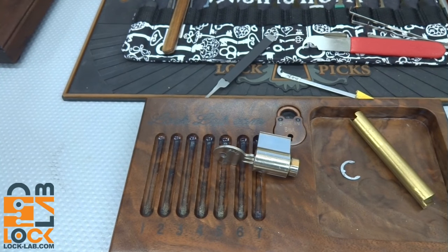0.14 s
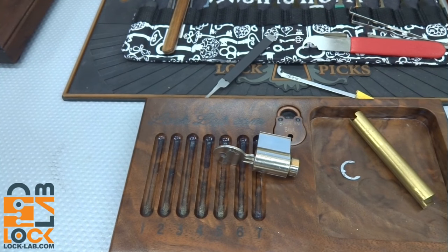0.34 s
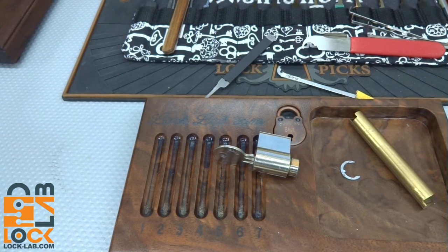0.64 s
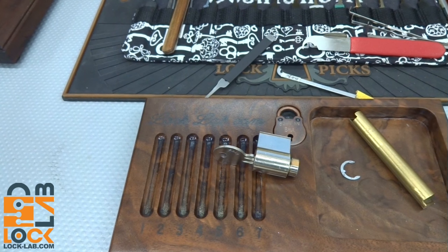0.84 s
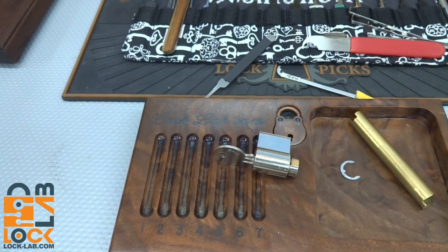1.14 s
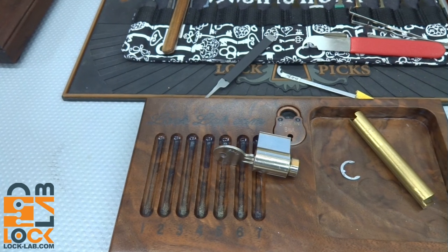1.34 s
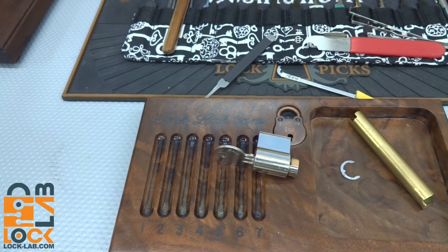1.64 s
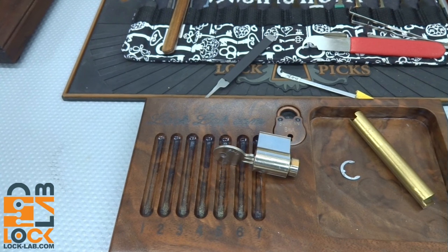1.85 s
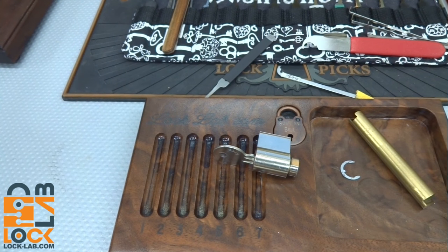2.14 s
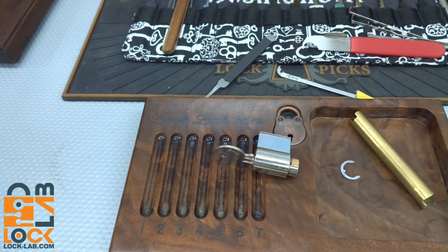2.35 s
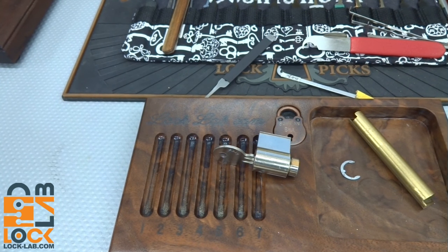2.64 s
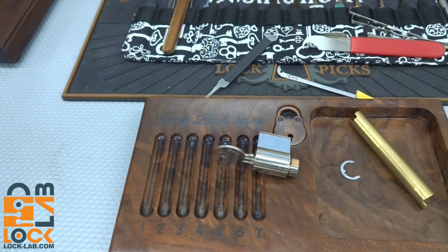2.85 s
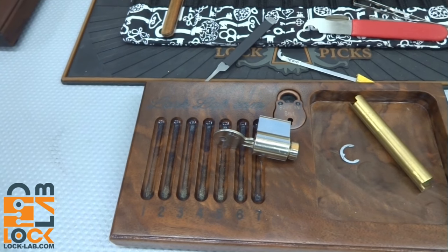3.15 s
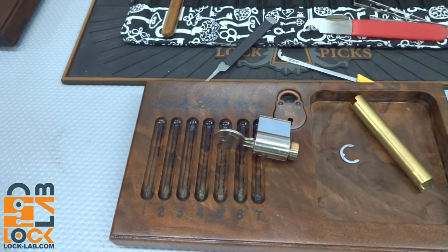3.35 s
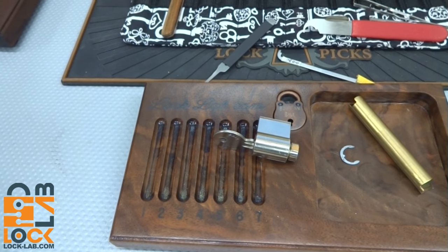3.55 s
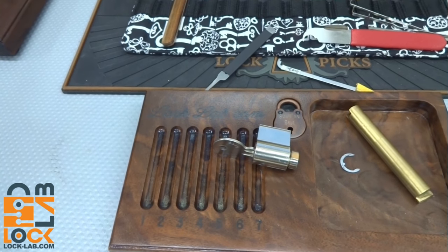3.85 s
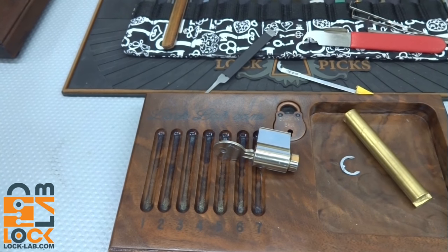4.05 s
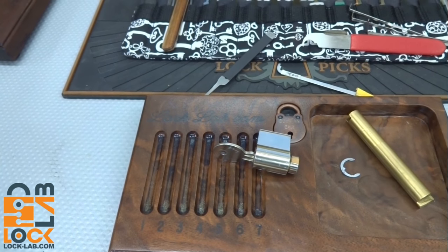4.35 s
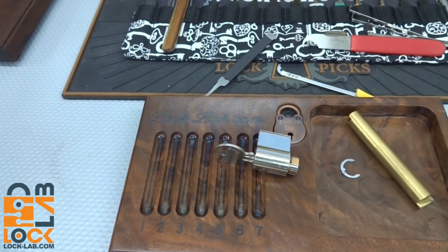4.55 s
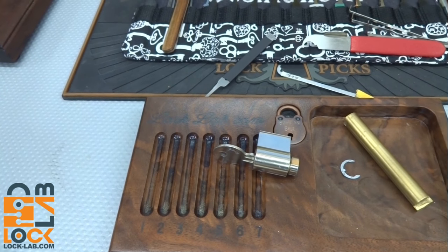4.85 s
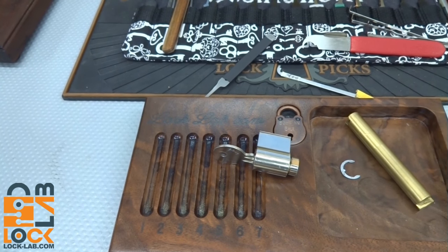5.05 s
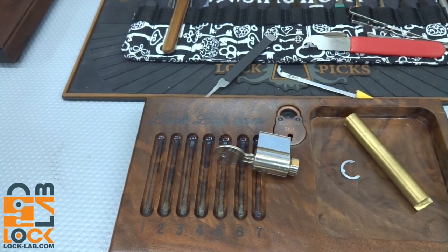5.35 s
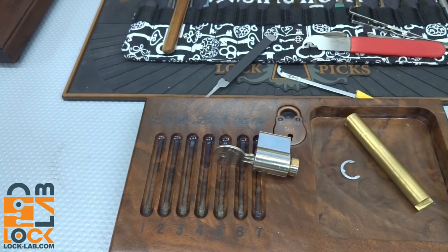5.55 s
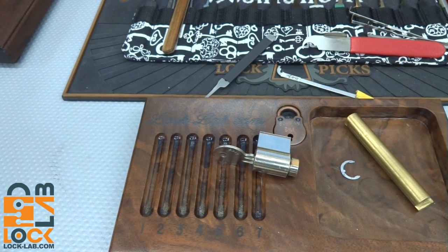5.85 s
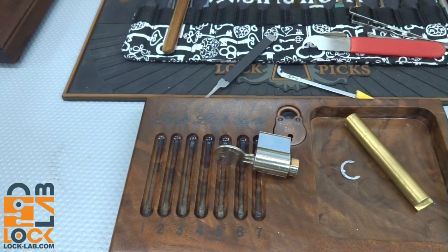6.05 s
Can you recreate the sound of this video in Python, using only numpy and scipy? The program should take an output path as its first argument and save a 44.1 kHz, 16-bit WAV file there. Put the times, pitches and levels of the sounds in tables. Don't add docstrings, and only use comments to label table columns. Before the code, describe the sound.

Unseen hands rummage through loose metal tools, leaving a wavering steel ring, then crinkle wrapping, bang a drawer and set tinkling parts on a bench.

```python
import sys
import numpy as np
from scipy import signal
from scipy.io import wavfile
from scipy.ndimage import uniform_filter1d

SR = 44100
rng = np.random.default_rng(int(sys.argv[2]) if len(sys.argv) > 2 else 0)


def persist_wave(psi):
    counts = np.round(np.clip(psi, -1, 1) * 32767).astype(np.int16)
    wavfile.write(sys.argv[1], SR, np.atleast_2d(counts).T)


def level_to_linear(level):
    exponent = np.asarray(level, float) / 20
    return 10 ** exponent


N = 273841


def evened(x):
    return x / np.sqrt(np.mean(x ** 2) + 1e-20)


def read(points, hz):
    f, value = np.transpose(points)
    return np.interp(np.log(hz + 1), np.log(f + 1), value)


def add(mix, s, sound):
    part = mix[round(s * SR):][:len(sound)]
    part += sound[:len(part)]


def colour(x, points):
    skirt_db = -40.5
    points = [(points[0][0] / 4, points[0][1] + skirt_db)] + points
    hz = abs(np.fft.fftfreq(4096, 1 / SR))
    log_gain = np.log(level_to_linear(np.maximum(read(points, hz), -100)))
    minimum_phase = np.exp(np.conj(signal.hilbert(log_gain)))
    taps = np.fft.ifft(minimum_phase).real[:2048]
    return signal.oaconvolve(x, taps)[:len(x)]


def ring(x, hz, t60):
    r = level_to_linear(-60 / (max(t60, .002) * SR))
    w = 2 * np.pi * min(hz, SR / 2.1) / SR
    return signal.lfilter([0, np.sin(w)], [1, -2 * r * np.cos(w), r * r], x)


def drift(per_s, size):
    steps = rng.standard_normal(200)
    return np.interp(np.arange(size) * per_s / SR, np.arange(len(steps)), steps)


def wavering_db(size):
    return 1.3 * drift(18, size=size) + 2.6 * drift(70, size=size)


def contacts(per_s, spread_db, size=N):
    chance, big, sign = rng.random((3, size))
    height = level_to_linear(spread_db * np.minimum(-np.log(big + 1e-9), 4))
    return (chance < per_s / SR) * height * np.sign(sign - .5)


def effort(t, held, swell_db, fade_db_per_s):
    attack_s, settling_db, settling_db_per_s = 0.0053, -25.5, 44
    after = np.maximum(t - held, 0)
    hold_db = swell_db * (np.clip(t / held, 0, 1) - (swell_db > 0))
    release = level_to_linear(-fade_db_per_s * after) + level_to_linear(settling_db - settling_db_per_s * after)
    return np.clip(t / attack_s, 0, 1) * level_to_linear(hold_db) * release


def loose(train, points, t60, ringing_db, count):
    lo_hz, hi_hz, step = 1.1 * points[1][0], .92 * points[-2][0], SR // 10
    rings, which = np.zeros(N), rng.integers(0, count, N)
    for at in range(0, N, step):
        near, part = which[at:at + step], train[at:at + step]
        pitches = lo_hz * (hi_hz / lo_hz) ** rng.random(count)
        for k, hz in enumerate(pitches):
            struck = np.pad(part * (near == k), (0, step // 2))
            add(rings, at / SR, np.sqrt(hz) * ring(struck, hz, t60))
    sound = colour(evened(train) + level_to_linear(ringing_db) * evened(rings), points)
    return sound / np.sqrt(uniform_filter1d(sound ** 2, 3000) + 1e-20)


# frequency in Hz, level in dB per Hz
AIR = [(15, -65), (25, -13), (219, -12.5), (303, -8.5), (683, -1.5), (849, -7), (1050, -2), (1270, -4.5),
       (5980, -15), (10300, -16), (16300, -31)]


def hush():
    shared, left, right = (evened(colour(v, AIR)) for v in rng.standard_normal((3, N)))
    return level_to_linear(-53) * (0.25 * shared + 0.8 * np.array([left, right]))


# frequency in Hz, level in dB per Hz
BENCH = [(24, -51), (40, -26), (130, -10), (198, -5.5), (252, -1.5), (291, -9), (366, -2.5), (480, -3.5),
         (620, -38), (1060, -120)]
DRAWER = [(240, -24), (400, -6), (524, 2.5), (627, 2.5), (780, 4), (1140, 2.5), (1630, 3), (2230, -5),
          (2400, -3.5), (3120, -14), (5280, -120)]
TOOLS = [(1180, -23), (2000, -4), (2470, -6), (2700, -5.5), (3360, -5), (3910, -5), (6500, -21),
         (8450, -29.5), (14300, -120)]
THIN = [(3240, -19.5), (5500, -10), (6400, -9.5), (7750, -5), (11600, -5.5), (12700, -4), (15100, -8),
        (16100, -16), (16400, -31.5)]
STEEL = [(3240, -12), (5500, 4), (6900, -0.5), (7910, 2), (10400, 1), (15400, -10.5), (16300, -27)]
# start in seconds, end in seconds
WRAPPING_TIMES = [
    (2.065, 2.985),
    (3.355, 3.545),
    (3.955, 4.0),
]
# start in seconds, held time in seconds, force in dB,
# weight on the bench in dB, sheen (brightness) in dB
JOLTS = [(0.082, 0.067, -35.5, -46, -8), (0.523, .005, -44, -14, 11), (0.621, .025, -39, -21, -3),
         (0.752, 0.027, -21.5, -14.5, -15.5), (0.917, 0.079, -19, -12.5, -7),
         (1.0, 0.39, -33.5, -14.5, -12.5), (1.406, 0.11, -21.5, -19, 3), (1.608, 0.18, -19, -15, 2.5),
         (2.071, 0.031, -42, -31, 11), (2.986, 0.12, -22.5, -1.5, -11.5), (2.995, 0.17, -41, -30, 28),
         (3.262, 0.07, -38, -30, 27), (3.231, 0.0033, -24, -28, -14.5), (3.259, 0.035, -18, -4.5, -10.5),
         (3.355, 0.067, -30.5, -21, 31.5), (3.551, 0.031, -21, -6.5, 6.5), (3.716, 0.085, -17.5, -13, 0),
         (3.9, 0.0099, -25, -32, 5), (3.955, 0.041, -27, -9.5, 14.5), (4.085, 0.0093, -33.5, -23, 17),
         (4.256, 0.07, -37, 1, 1.5), (4.414, 0.031, -22, -13.5, -10.5), (4.949, 0.012, -44, -37, -3),
         (5.486, 0.0061, -46.5, -28, 18), (5.535, 0.14, -52.5, -25, 14), (5.864, .01, -63, -20, 2)]
# start in seconds, swelling time in seconds, force in dB,
# weight on the bench in dB, sheen in dB
SLIDES = [(0, 0.066, -52.5, -15, -15.5), (.2, 0.23, -51, -23, -7), (.635, 0.025, -33.5, -8.5, -5),
          (.68, 0.053, -38.5, -4, -1), (.49, 0.02, -56.5, 2.5, -6), (.77, 0.05, -23.5, -19, 9.5),
          (1.224, 0.12, -24.5, -13.5, -8.5), (1.5, 0.072, -26, -14, -16.5), (2.95, 0.036, -36, -21, -5),
          (4.13, 0.088, -50, -1.5, -8), (4.62, 0.19, -60, -19, -23), (4.86, 0.08, -50.5, -35, -6),
          (4.97, 0.16, -38.5, -8, 18), (5.23, 0.068, -36.5, -22, 11), (5.87, 0.1, -51.5, -21, -6),
          (6.08, 0.43, -52, -13, 39)]
# time in seconds, effort in dB
CRUMPLE = [
    (2.165, -61.5),
    (2.417, -40),
    (2.653, -25.5),
    (2.681, -26.5),
    (2.691, -24),
    (2.853, -29.5),
    (2.883, -31),
    (2.98, -37),
]
# offset in dB, share of effort (no unit)
CRUMPLE_PARTS = (-74, .2), (-39, 0.27), (-18, 0.59), (2.5, 0.97)
FADES = 131, 152, 142, 203
SHEEN_SHARES = -0.67, -0.45, -0.012, 0.39


def rummage():
    sag_db_per_s, swell_db_of_slides = 15, 20
    train = contacts(4000, spread_db=2.1)
    t, coarse = np.arange(N) / SR, np.arange(0, N, 32) / SR
    wrapped = sum((t > a) & (t < b) for a, b in WRAPPING_TIMES)
    wrapping = loose(train, THIN, 0.028, ringing_db=-25, count=4)
    steel = loose(train, STEEL, .025, ringing_db=-11, count=10)
    bench = loose(train, BENCH, 0.072, ringing_db=-15.5, count=4)
    drawer = loose(train, DRAWER, 0.11, ringing_db=-12.5, count=8)
    tools = loose(train, TOOLS, 0.019, ringing_db=-8.0, count=10)
    thin = np.where(wrapped, wrapping, steel)
    moves = [(-sag_db_per_s * row[1], *row) for row in JOLTS]
    moves += [(swell_db_of_slides, *row) for row in SLIDES]
    crumple_db = np.interp(coarse, *np.transpose(CRUMPLE), -200, -200)
    out = 0
    for k, layer in enumerate((bench, drawer, tools, thin)):
        offset_db, share = CRUMPLE_PARTS[k]
        power = level_to_linear(offset_db + share * crumple_db) ** 2 * (crumple_db > -199)
        for swell_db, s, held, force_db, weight_db, sheen_db in moves:
            db = force_db + SHEEN_SHARES[k] * sheen_db + (weight_db if k == 0 else 0)
            power = power + (level_to_linear(db) * effort(coarse - s, held, swell_db, FADES[k])) ** 2
        out = out + layer * np.interp(t, coarse, np.sqrt(power))
    return level_to_linear(-4.5) * out


def knock(s, peak_db, hz, bright_db, t60, cycles=18, rise_s=0.00067):
    t = np.arange(5000) / SR
    swell = (1 - np.exp(-t / rise_s)) * level_to_linear(-60 * t / t60)
    bounces = (rng.random(len(t)) < 9000 / SR) * rng.standard_normal(len(t)) * swell
    note = ring(bounces, hz, cycles / hz) + 0.5 * ring(bounces, 1.74 * hz, 0.38 * cycles / hz)
    note = signal.lfilter(*signal.butter(2, hz / 2, "high", fs=SR), note)
    crack = colour(bounces, THIN if hz > 7000 else STEEL)
    clatter = colour(bounces, TOOLS)
    parts = (note, -.5), (crack, bright_db + 12), (clatter, -12)
    sound = sum(level_to_linear(peak_db - 6.0 + db) * p / abs(p).max() for p, db in parts)
    return signal.lfilter(*signal.butter(2, hz / 6, "high", fs=SR), sound)


def knock_each(rows, **kind):
    out = np.zeros(N)
    for row in rows:
        add(out, row[0], knock(*row, **kind))
    return out


# start in seconds, peak in dB, pitch in Hz, brightness in dB
OPENING = [(.54, -31.5, 1470, -24), (0.11, -18, 3800, -31), (0.618, -20.5, 1440, -13),
           (0.658, -26, 1070, -2), (0.762, -2, 774, -34), (0.809, -33, 744, -7), (0.928, -3, 2730, -34),
           (0.959, -12, 750, -27), (1.289, -15, 2660, -30), (1.332, -29, 1350, -25), (1.36, -17, 1920, -9),
           (1.43, -6.5, 1840, -9.5), (1.47, -13, 1110, -9), (1.689, -10, 1120, -1), (1.579, -4, 990, -30),
           (2.121, -34, 1270, -23), (2.339, -48, 1140, 7)]


def opening_knocks():
    return knock_each(OPENING, t60=0.11)


# start in seconds, length in seconds, pitch in Hz, level in dB
RUBS = [(.27, 0.05, 120, -64), (.5, 0.035, 168, -55), (1.29, 0.034, 1353, -30), (1.34, 0.043, 1893, -39),
        (1.455, 0.031, 2524, -20.5), (1.56, 0.063, 1750, -21), (1.575, 0.026, 997, -17),
        (1.585, 0.024, 697, -12.5), (1.6, 0.252, 266.5, -36), (1.62, .06, 2430, -24.5),
        (1.62, 0.21, 5400, -30), (1.68, 0.12, 1925, -29), (1.7, 0.089, 3990, -25.5),
        (1.745, 0.06, 4680, -20), (1.64, 0.2, 15830, -47), (1.656, 0.17, 13800, -42),
        (1.678, 0.12, 12500, -42), (1.7, 0.12, 14900, -40), (1.7, 0.083, 8900, -29.5),
        (1.423, 0.023, 2930, -23), (1.529, 0.034, 423, -29), (1.831, .07, 2250, -33),
        (3.729, 0.057, 1923, -22), (3.816, 0.036, 1660, -31), (3.577, 0.051, 627, -28.5),
        (5.87, .05, 1480, -59), (.62, 0.043, 1150, -39), (4.413, 0.13, 303.5, -35.5),
        (4.721, .07, 421, -53), (2.0, 0.046, 846, -45), (2.18, 0.061, 850, -52), (2.74, 0.085, 199, -61),
        (3.015, 0.039, 135, -19), (3.115, 0.031, 243, -12.5), (3.14, 0.027, 142, -19.5),
        (4.09, 0.032, 958, -40), (4.5, 0.12, 87, -49)]


def rubs():
    out = np.zeros(N)
    for s, length, hz, db in RUBS:
        t = np.arange(0, length, 1 / SR)
        clock = np.cumsum(1 + .006 * drift(90, size=len(t))) / SR
        level = level_to_linear(db + wavering_db(len(t))) * np.sin(np.pi * t / length)
        add(out, s, level * np.sin(2 * np.pi * hz * clock))
    return out


# start in seconds, peak in dB, pitch in Hz, brightness in dB
TICKS = [(0.849, -1.5, 3480, -25), (0.913, -4.5, 1310, -29), (2.444, -33, 730, -39), (2.691, -13, 9500, -8),
         (2.79, -33, 800, -25), (3.031, -4.5, 870, -14), (3.083, -12, 696, -19), (3.267, -1, 1010, -31),
         (3.109, 1, 498, -32), (3.118, -6.5, 352, -30), (3.551, -1.5, 4330, -22), (3.994, -3, 2330, -15),
         (4.006, -12.5, 1730, -10), (4.186, -29.5, 458, -16), (4.197, -27, 1800, -20),
         (5.282, -24.5, 1940, -4), (5.571, -36, 1420, -16), (5.728, -49, 500, -22), (5.912, -38, 3000, -7),
         (5.924, -27, 680, -35), (5.945, -28, 725, -35), (5.968, -31.5, 610, -29), (5.995, -41, 620, -28),
         (.769, -8, 910, -26), (.979, -15.5, 1510, -21), (1.667, -11.5, 2230, -5), (3.297, -2, 694, -22),
         (3.829, -16, 1700, -7), (4.453, -5, 1600, -19.5)]


def ticks():
    return knock_each(TICKS, t60=0.065, cycles=10.5)


# start in seconds, held time in seconds, level in dB
JOSTLE = [
    (0.927, 0.066, -28.5),
    (1.398, 0.15, -31),
    (1.62, .23, -35.5),
]
BENDING_HZ = [421, 840, 1175, 2299, 3792, 5640, 7832, 10500, 13100, 15500]
# level in dB, time to die by 60 dB in seconds
BENDING = [(-14, 4.5), (-28, 1.12), (-7, 7), (-4, 4.46), (-2, 1.68), (-3, 0.96), (-3, 0.72), (-12, 0.32),
           (-21, 0.3), (-24, .3)]
RODS_FLAT = [-.9, .3, 0, 1.05, 1.9, 2.6]
RODS = [-9.5, -10, -4, -5.5, -6, -7]


def rods():
    start, lifted_s, gripped_s = .88, 1.75, 2.99
    t = start + np.arange(round(2.2 * SR)) / SR
    jostle = sum(level_to_linear(db) * effort(t - s, held, -.01, fade_db_per_s=143) for s, held, db in JOSTLE)
    lying = 1 / (1 + np.exp((t - lifted_s) / 0.056))
    out, bundle = np.zeros(N), 0
    sway = [np.cumsum(1 + .003 * drift(30, size=len(t))) / SR for rod in RODS]
    for hz, (mode_db, t60) in zip(BENDING_HZ, BENDING):
        stored = np.sqrt(signal.lfilter([1 / SR], [1, -level_to_linear(-120 / (t60 * SR))], jostle ** 2))
        muted_db = min(110 * (BENDING_HZ[0] / hz) ** 2, 25) * lying
        swing_db = 2.6 * drift(60, size=len(t))
        stored = stored * level_to_linear(9.5 + mode_db - muted_db + swing_db)
        for flat, rod_db, clock in zip(RODS_FLAT, RODS, sway):
            pitch = hz * (1 - flat / 100 + rng.normal(0, .001))
            wave = np.sin(2 * np.pi * (pitch * clock + rng.random()))
            bundle = bundle + stored * level_to_linear(rod_db + wavering_db(len(t))) * wave
    add(out, start, bundle * level_to_linear(-900 * np.maximum(t - gripped_s, 0)))
    return out


# start in seconds, peak in dB, pitch in Hz, brightness in dB
SNAPS = [(1.224, -28.5, 9000, 1.5), (1.269, -23, 9600, -13), (1.354, -19, 8200, -12),
         (2.549, -16, 8500, -12), (2.856, -15, 9400, -15), (2.565, -18, 12800, -4.5),
         (2.589, -36, 11400, -14), (2.61, -17.5, 12200, 2), (2.634, -23, 12400, 7), (2.647, -13, 8000, -6),
         (2.692, -16.5, 11300, -1), (2.706, -11, 13200, -13), (2.756, -9, 13000, -8),
         (2.874, -9.5, 10700, -5), (2.911, -10.5, 13400, -10), (2.944, -18, 9200, 0.5)]


def snaps():
    return knock_each(SNAPS, t60=0.059, rise_s=0.0029)


# start in seconds, peak in dB, pitch in Hz, brightness in dB
SHUTTING = [(2.987, 1.5, 1070, -24), (3.05, -3, 540, -19), (3.264, -4, 1570, -29), (3.552, -9, 2290, -7),
            (3.719, -5, 760, -21), (3.784, -13, 2090, 0.5), (3.908, -9.5, 1850, -11), (3.96, -18, 7800, 6),
            (4.094, -8, 11100, -10), (4.301, -14.5, 4560, -10.5), (4.419, -6, 2050, -28),
            (4.423, -6, 4000, -27), (4.448, -9.5, 774, -29), (4.499, -13, 746, -35)]


def shutting():
    return knock_each(SHUTTING, t60=0.11)


# struck in seconds, stopped in seconds
STRUCK_TIMES = [
    (3.548, 3.72),
    (3.96, 4.09),
    (4.095, 4.3),
    (4.42, 4.95),
    (2.99, 3.2),
    (5.32, 5.4),
    (5.489, 5.7),
    (4.42, 5.92),
    (3.72, 3.9),
    (4.42, 4.65),
]
# blow in dB, then modes of pitch in Hz, level in dB, time to die by 60 dB in seconds
PARTS = [
    (-26.5, [(596, -9, .5), (2455, -6, 0.2), (2975, -1, .5), (4320, -3, 0.2), (2150, -5, .2), (5430, 2, 0.45), (6094, -14, 0.3), (8236, -8, .2), (9150, -5, 0.3), (10980, -11, 0.32), (11820, -12, .3)]),
    (-39, [(9450, -9, .4), (10950, -3, 0.43)]),
    (-36, [(8904, -9, .15), (9545, -9, 0.3), (10930, 2, 0.3)]),
    (-52, [(2050, -2, 3), (4050, -2, 3), (4800, -1.5, 0.7)]),
    (-30, [(262, -3, .4), (360, -1.5, .3), (470, -3, .3), (592, -.3, .3)]),
    (-45, [(4750, -3.5, .6)]),
    (-46, [(2137, -5, 0.5), (4107, -5, 0.9), (4750, -4, 1.5), (5216, -4, 3.6), (6180, -4, 1.6), (8576, -16, .6), (9663, -9, 1.2), (10640, 1.5, 0.8), (10900, -1.5, 0.8)]),
    (-65.5, [(418, -3, 7.7), (424, -4.5, 11)]),
    (-27, [(540, -7, .4), (1500, -5, .25), (1940, -.3, .3), (2239, -7, .4)]),
    (-30, [(738, -2.5, .24), (1653, -1.5, .29), (2143, -3, .15)]),
]


def small_parts():
    out = np.zeros(N)
    for (s, stop), (blow_db, modes) in zip(STRUCK_TIMES, PARTS):
        t = np.arange(round((stop - s + .1) * SR)) / SR
        held_db = blow_db - 900 * np.maximum(t + s - stop, 0)
        for hz, mode_db, t60 in modes:
            clock = np.cumsum(1 + .0025 * drift(70, size=len(t))) / SR
            twin = np.sin(2 * np.pi * (hz * 1.004 * t + rng.random()))
            pair = np.sin(2 * np.pi * hz * clock) + 0.69 * twin
            level = level_to_linear(held_db + mode_db + wavering_db(len(t)) - 60 * t / t60)
            add(out, s, level * pair * (1 - np.exp(-t / 0.0011)))
    return out


# start in seconds, peak in dB, pitch in Hz, brightness in dB
SETTING_DOWN = [(4.955, -21.5, 1600, -18), (5.041, -25, 2060, -12), (5.1, -43, 164, -40),
                (5.248, -29, 2480, -6), (5.283, -21, 1760, -11), (5.42, -24, 4000, -11),
                (5.4845, -22, 5160, -3.5), (5.491, -18, 6160, -29), (5.569, -23, 10500, -29),
                (5.7, -36.5, 10700, -8), (5.863, -34.5, 6100, -14)]


def setting_down():
    return knock_each(SETTING_DOWN, t60=0.11)


# time in seconds, level in dB, centre in Hz
SCRAPE = [
    (4.959, -35, 1760),
    (4.982, -50, 1750),
    (5.07, -42, 1990),
    (5.113, -31, 2020),
    (5.238, -42.5, 2540),
    (5.247, -33.5, 2700),
    (5.311, -50, 2160),
    (5.42, -53, 2310),
]


def scrape():
    s, db, hz = np.transpose(SCRAPE)
    t = np.arange(N) / SR
    turn = np.exp(2j * np.pi * np.cumsum(np.interp(t, s, hz)) / SR)
    r = np.exp(-np.pi * 1200 / SR)
    slips = signal.lfilter([1], [1, -2 * r, r * r], contacts(5000, spread_db=1.0) / turn)
    sound = signal.lfilter(*signal.butter(2, 900, "high", fs=SR), (turn * slips).real)
    return evened(sound) * level_to_linear(np.interp(t, s, db + .5, -120, -120))


# frequency in Hz, time to die by 60 dB in seconds
ROOM = [(100, 0.29), (700, 0.62), (4800, 0.5), (13000, 0.44)]


def room(x):
    taps = np.zeros((2, SR))
    at = np.arange(200, SR - 20, 20)
    at = at + rng.integers(0, 20, (2, len(at)))
    np.put_along_axis(taps, at, rng.choice([-1., 1.], at.shape), 1)
    taps[1] = 0.5 * taps[0] + 0.41 * taps[1]
    hz, t, z = signal.stft(taps, SR, nperseg=256)
    tail = signal.istft(z * level_to_linear(-60 * t / read(ROOM, hz)[:, None]), SR, nperseg=256)[1]
    tail = tail / np.linalg.norm(tail, axis=1)[:, None]
    return signal.fftconvolve(x[None], tail, axes=1)[:, :N]


# time in seconds, left minus right in dB
WHERE = [
    (0.07, 0.5),
    (0.67, -3.5),
    (2.1, -3),
    (3.5, -2),
    (4.4, -2.1),
    (4.6, -1),
    (4.97, -3),
    (6.1, -2),
]


def scene():
    near = rummage() + opening_knocks() + rubs() + ticks() + rods() + snaps()
    near = near + shutting() + small_parts() + setting_down() + scrape()
    pan_db = np.interp(np.arange(N) / SR, *np.transpose(WHERE)) * np.array([[.5], [-.5]])
    return (near + level_to_linear(-8.0) * room(near)) * level_to_linear(pan_db - 0.72) + hush()


def roll_off(x):
    return signal.sosfilt(signal.butter(12, 15900, fs=SR, output="sos"), x)


def record(dry):
    loud = 0.78 * np.tanh(dry / 0.82)
    mid, side = (loud[0] + loud[1]) / 2, (loud[0] - loud[1]) / 2
    side = level_to_linear(-2.0) * signal.lfilter(*signal.butter(1, 200, "high", fs=SR), side)
    scatter = rng.standard_normal(4000) * level_to_linear(-np.arange(4000) / 80)
    scattered = signal.oaconvolve(mid, scatter / np.linalg.norm(scatter))[:N]
    side = side + level_to_linear(-14) * signal.lfilter(*signal.butter(1, 900, "high", fs=SR), scattered)
    band = signal.butter(2, 32, "high", fs=SR, output="sos")
    edge = signal.firwin(255, 16750, window=("kaiser", 9), fs=SR)
    pair = signal.sosfilt(band, [mid + side, mid - side])
    pair = signal.oaconvolve(pair, edge[None], "same")
    return roll_off(pair)


dry = scene()
out = record(dry)
persist_wave(out)
```